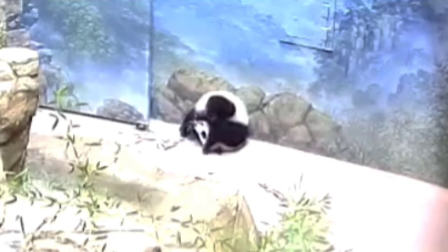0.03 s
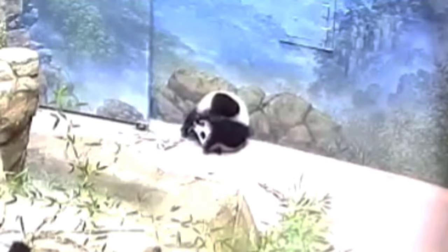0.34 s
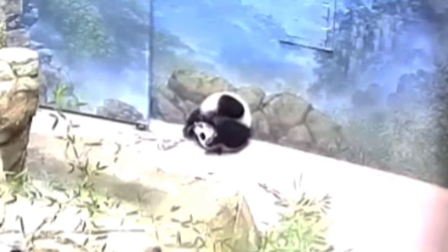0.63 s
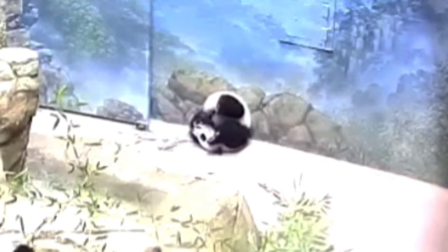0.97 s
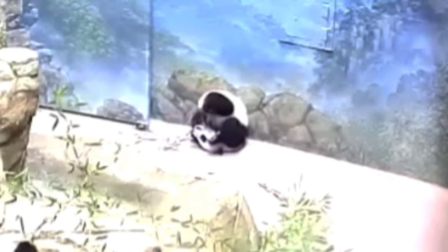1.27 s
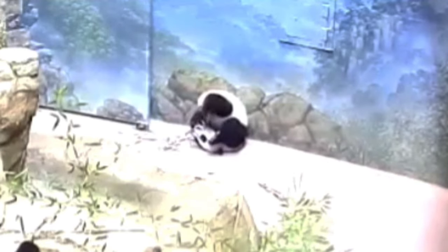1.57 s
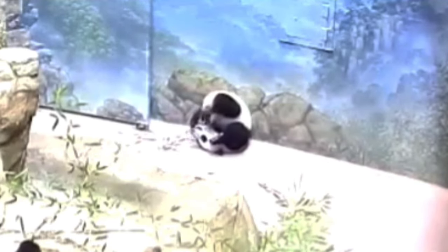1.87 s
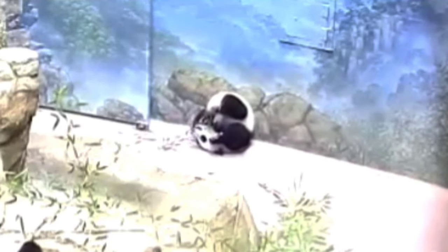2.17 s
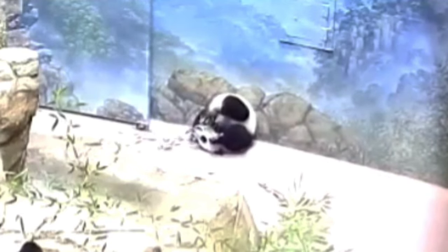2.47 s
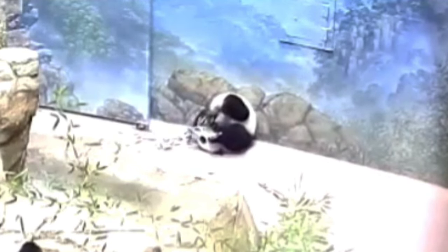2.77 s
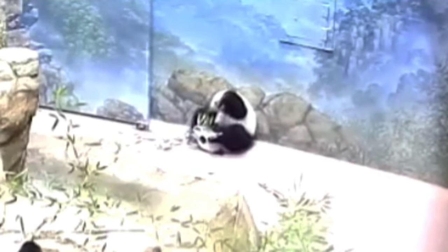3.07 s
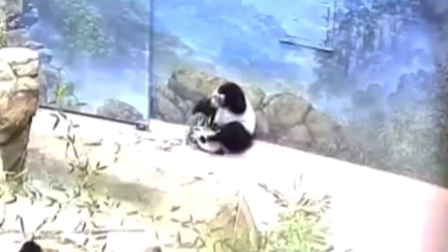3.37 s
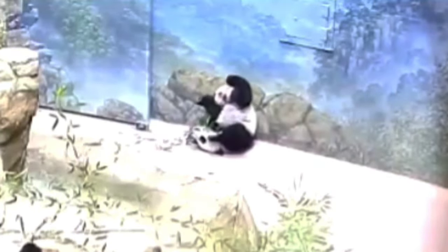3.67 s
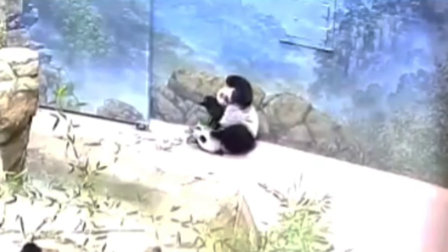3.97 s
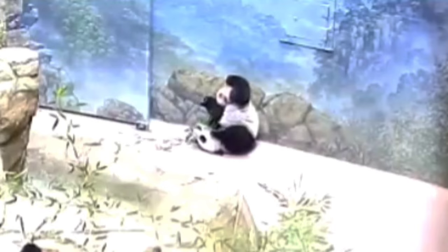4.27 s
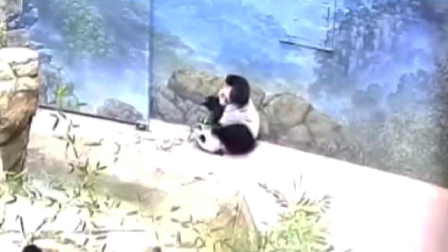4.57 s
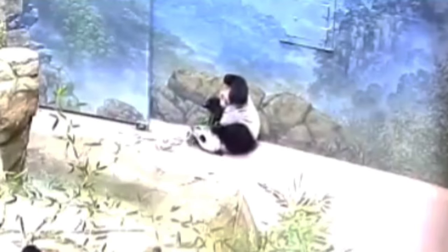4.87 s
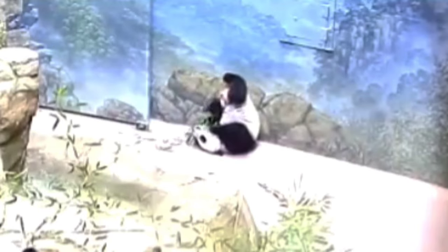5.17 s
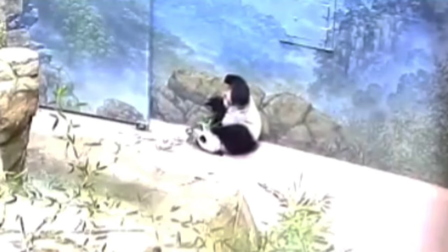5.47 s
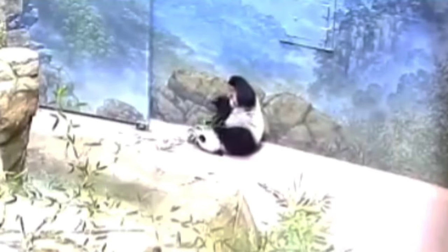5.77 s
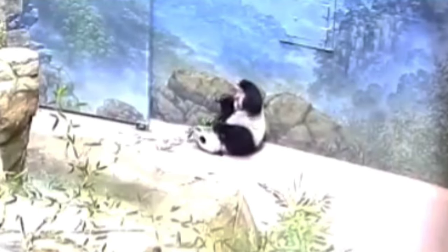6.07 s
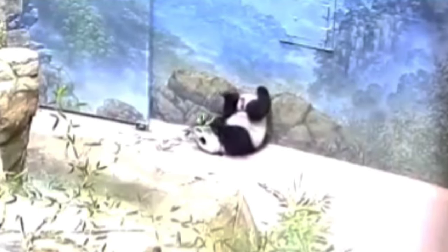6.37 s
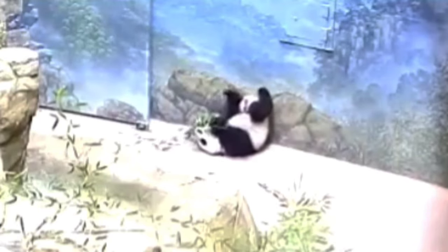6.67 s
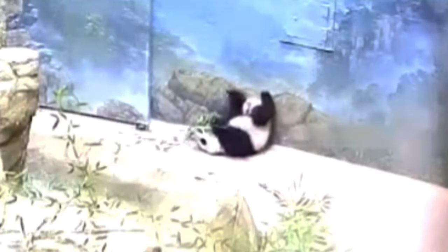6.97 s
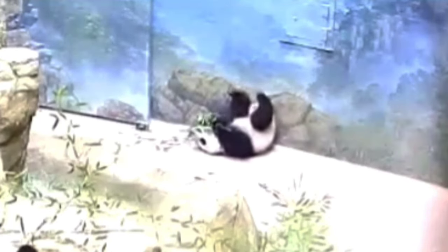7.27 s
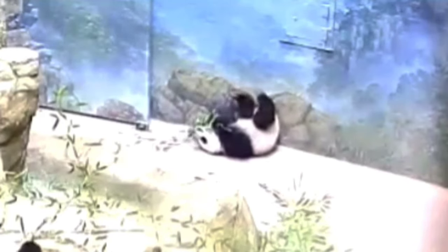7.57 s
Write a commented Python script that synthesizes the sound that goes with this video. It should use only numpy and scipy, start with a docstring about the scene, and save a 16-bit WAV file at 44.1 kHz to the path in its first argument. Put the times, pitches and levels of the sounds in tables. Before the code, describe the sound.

Ventilation rushes steadily in an echoing animal enclosure while a panda, several metres from a small mono microphone, splinters a bamboo stalk and tears off a strip. Lighter, irregular snaps follow, with quiet chewing, stirring leaves and faint dull knocks. Near the end another strip rips off loudly, followed by more bites. The hiss dips at each rip and creeps back up.

```python
"""A hard-walled indoor enclosure, with a small mono camera microphone some metres from a feeding panda.
The panda bites dry bamboo: each snap is a quick run of breaking fibres that rings the stalk, and twice a
long strip rips off. Between bites come chewing, stirring leaves and bumps on the ledge. The hall rings
over steady ventilation; the camera's gain control ducks at the rips and creeps back up."""
import sys
import numpy as np
from scipy import signal
from scipy.fft import rfft, irfft
from scipy.io import wavfile
from scipy.ndimage import uniform_filter1d, minimum_filter1d

SR = 44100
rng = np.random.default_rng(int(sys.argv[2]) if len(sys.argv) > 2 else 0)


def wav_out(sig):
    """Save sig, one row per channel (or a flat mono array), as 16-bit PCM at SR to the path in sys.argv[1]."""
    wavfile.write(sys.argv[1], SR, np.round(np.clip(np.atleast_2d(sig).T, -1, 1) * 32767).astype(np.int16))


N = 340452
TIME = np.arange(N) / SR
BIN_HZ = np.arange(N // 2 + 1) * SR / N

# rush of the ventilation: f/Hz, relative level/dB
AIR_SPECTRUM = [(22, -35), (48, -15), (130, -13.5), (280, -15), (400, -6), (520, -0.5), (680, -6.5),
                (850, -2), (1550, -1.5), (2000, -6.5), (2500, -15), (3900, -21), (5000, -20.5),
                (6800, -24.5)]
# resonances of the air ducts: f/Hz, width/Hz, level/dB
DUCT_MODES = [(46.4, 17, -72.5), (199.5, 31, -66), (390.4, 67, -58), (490, 36, -70), (844, 40, -57),
              (1560, 60, -51.5), (3880, 90, -63.5)]
# decay of the hall: f/Hz, reverberation time/s
HALL_DECAY = [(300, 0.67), (900, 2.1), (2000, 1.48), (4000, 1.27), (7000, 1.11)]
# reflections from the ledge and the walls: delay/s, level re direct sound/dB
WALL_ECHOES = [(.0045, -11.5), (.017, -12.5), (.034, -11.5)]
# dull knocks of the body and stalks on the ledge: t/s, relative level/dB, f/Hz
LEDGE_BUMPS = [(1.074, -39.5, 354), (1.169, -38.5, 416), (2.115, -34, 834), (2.12, -37, 430),
               (3.27, -42.5, 423), (4.33, -46.5, 386), (6.903, -38, 350), (6.939, -37, 370),
               (7.651, -42, 390)]
# crackle of dry leaves: f/Hz, relative level/dB
LEAF_SPECTRUM = [(300, -15), (1000, 3.5), (2000, 5), (3000, 2.5), (4200, -3), (5200, -8.5), (6500, 3.5),
                 (7400, -14.5)]
# swells of rustle: t/s, rise/s, peak level/dB, fade/(dB/s)
# first row stands for the hall still ringing from a crack just before the start; others: leaves stirring
RUSTLE_SWELLS = [(0, 0.0042, -32.5, 164), (1.14, 0.026, -40, 57), (1.549, 0.039, -44, 40),
                 (2.11, 0.034, -53.5, 35), (2.58, 0.037, -62, 42), (3.24, 0.063, -54, 87),
                 (3.75, 0.079, -60, 45), (5.92, 0.12, -55, 23.5), (6.89, 0.041, -39.5, 55),
                 (7.269, 0.036, -49.5, 42)]
# resonances of the bamboo stalk: f/Hz, width/Hz, relative level/dB
STALK_MODES = [(830, 220, -19), (1430, 180, -5), (2330, 260, -9), (2880, 240, -12), (3300, 220, -7),
               (4250, 400, -10), (5700, 500, -20), (6750, 550, -15)]
# crackle of peeling fibres: f/Hz, relative level/dB
PEEL_SPECTRUM = [(200, -34), (600, -15), (900, -11), (1300, -9), (1950, -1), (3200, 0.5), (3900, -11),
                 (4500, -7.5), (5200, -4.5), (6500, 0), (7400, -7)]
# strips tearing off: t/s, rise to the hardest pull/s, level there/dB, fade/(dB/s)
STRIP_RIPS = [(.405, 0.061, -15.5, 153.5), (6.36, 0.055, -19.5, 154)]
# bites: t/s, level/dB, break length/s, splinter f/Hz, hollow/dB, woody/dB, sharpness/dB
BITE_SNAPS = [(0.352, -30, 0.0053, 2010, -8, 10.5, 7), (0.362, -29, 0.014, 2100, -10, 5.5, 3),
              (0.383, -22.5, 0.004, 2770, -18, -1.5, 4), (0.395, -18, 0.0035, 2030, -15, 0, 13.5),
              (0.4, -22, 0.0032, 2040, -11, -2, 5), (0.421, -16.5, 0.0044, 2530, -7, 5, 4.5),
              (0.438, -20.5, 0.01, 3020, 0, -2, 14.5), (0.536, -18.5, 0.002, 2060, -13, 8, -6),
              (1.079, -33, 0.0055, 2100, 3.5, 1, -3), (1.16, -27, 0.0056, 2000, 0, -13, 0),
              (1.531, -38, 0.0015, 2440, -20, -1, 1), (1.560, -25, 0.0032, 2050, -4, -3, 5),
              (2.122, -27.5, .008, 1990, -0.5, -1, 5.5), (2.447, -38, 0.0038, 1380, 2, -11, -11),
              (2.947, -32.5, 0.0042, 1970, 0, 0.5, -5), (3.326, -35.5, 0.025, 2020, 4.5, -5, -7),
              (3.571, -42.5, 0.0028, 2130, 2, -0.5, -5), (3.846, -40, 0.014, 1920, 4, -2, -3),
              (3.892, -28, 0.01, 1840, 1.5, -7, -12), (4.030, -40, 0.0039, 1560, -2, -9, -1),
              (4.398, -32.5, 0.0065, 2100, 4, 5.5, -3.5), (4.915, -35, 0.0099, 1970, -3, 3.5, 3.5),
              (6.189, -30.5, 0.0046, 1650, 0, -5.5, -8.5), (6.333, -37.5, 0.012, 2130, -5, 4, -0.5),
              (6.356, -39, .0015, 2190, -9, 10, -1), (6.361, -18.5, .0019, 2060, -18, 2, 2.5),
              (6.377, -21, 0.0014, 2970, -16, 13.5, 10.5), (6.395, -25, 0.0025, 2700, -9, 6, 0),
              (6.407, -23, 0.0069, 1980, -10, -1, 4), (6.425, -21.5, 0.013, 3150, -1.5, 2, 10),
              (6.535, -25, 0.011, 2130, -3, -7.5, -6), (6.903, -31, 0.017, 2100, 3, 5, 2),
              (6.930, -22, 0.008, 2120, 0, -4.5, -1), (7.273, -33, 0.015, 2040, -6, 8.5, 5.5),
              (7.284, -33.5, 0.0072, 2120, -7, -5, 3), (7.320, -31, 0.0046, 1665, -8, -5, -15)]
# the stalk's top modes in a break of middling sharpness: hard/dB, crisp/dB
TOP_MODES_DB = (-1, 1.5)


def undb(db):
    """Decibels to gain."""
    return 10 ** (np.asarray(db) / 20)


def unit(x):
    """Scale to rms 1."""
    return x / np.sqrt(np.mean(x ** 2) + 1e-18)


def add(track, start, sound):
    """Mix a sound into the track, start seconds in."""
    i = max(int(start * SR), 0)
    track[i:i + len(sound)] += sound[:max(len(track) - i, 0)]


def resonate(x, hz, width):
    """A resonance with steep skirts: two band-passes in a row."""
    b, a = signal.iirpeak(hz, hz / (1.31 * width), fs=SR)
    return signal.lfilter(b, a, signal.lfilter(b, a, x))


def over_pitch(hz, points):
    """Read (f/Hz, value) points on a log-frequency axis."""
    f, value = np.transpose(points)
    return np.interp(np.log(hz + 1), np.log(f), value)


def coloured(x, spectrum):
    """Shape a sound by a smooth curve of (f/Hz, level/dB) points, at rms 1."""
    return unit(irfft(rfft(x) * undb(over_pitch(BIN_HZ, spectrum)), N))


def lag(x, tau_s):
    """Follow x with the time constant tau_s."""
    keep = np.exp(-1 / (tau_s * SR))
    return signal.lfilter([1 - keep], [1, -keep], x)


def swell(start, rise_s, peak_db, fade_db_per_s, rise_db):
    """Gain of one swell: it sets in, grows by rise_db to its peak and dies away."""
    past_peak = TIME - start - rise_s
    below_db = np.where(past_peak < 0, -past_peak / rise_s * rise_db, past_peak * fade_db_per_s)
    return (TIME >= start) * undb(peak_db - below_db)


def fibres(size, per_s, spread_db):
    """Impulses of fibres breaking at random moments, a few harder than the rest."""
    breaks = rng.random(size) < per_s / SR
    strength = undb(spread_db * np.minimum(rng.exponential(size=size), 4))
    return breaks * strength * rng.choice([-1, 1], size)


def ventilation(rush_db=-41.5, waver_db=.15):
    """Room tone: a broad rush of air with a few duct resonances, wavering slightly."""
    air = undb(rush_db) * coloured(rng.standard_normal(N), AIR_SPECTRUM)
    for hz, width, db in DUCT_MODES:
        air += undb(db) * unit(resonate(rng.standard_normal(N), hz, width))
    waver = signal.resample(rng.standard_normal(48), N)
    return air * undb(waver_db * waver)


def hall(x, build_s=0.0036, first_wall_s=.008):
    """Diffuse field: each band stores the energy it is fed and gives it back as a decaying wash."""
    edges_hz = np.geomspace(200, 7600, 23)
    tail, out = np.zeros(N), np.zeros(N)
    for lo, hi in zip(edges_hz, edges_hz[1:]):
        band = signal.butter(4, [lo, hi], "band", fs=SR, output="sos")
        hold_s = over_pitch(np.sqrt(lo * hi), HALL_DECAY) / (2 * np.log(1000))
        fed = lag(signal.sosfilt(band, x) ** 2, build_s)
        stored = lag(fed, hold_s)
        wash = unit(signal.sosfilt(band, rng.random(N) - .5))
        tail += np.sqrt(stored) * wash
    add(out, first_wall_s, tail)
    return out


def reflections(x):
    """The direct sound reaches the microphone first, then its echoes off the ledge and walls."""
    out = x.copy()
    for delay, db in WALL_ECHOES:
        add(out, delay, undb(db) * x)
    return out


def bumps(push_s=0.016, width_hz=110, contact_db=-14):
    """Soft, drawn-out contacts with the ledge that sound only a low resonance."""
    out, t = np.zeros(N), TIME[:SR // 4]
    for start, db, hz in LEDGE_BUMPS:
        force = rng.standard_normal(len(t)) * t * np.exp(-t / push_s)
        add(out, start, undb(db + contact_db) * unit(resonate(force, hz, width_hz)))
    return out


def rustle(rest_db=-58.5):
    """Light crackle of leaves and splinters; its opening swell stands for an earlier crack's tail."""
    level = undb(rest_db) + sum(swell(*row, rise_db=1.5) for row in RUSTLE_SWELLS)
    return level * coloured(fibres(N, per_s=900, spread_db=3.0), LEAF_SPECTRUM)


def stalk(force, splinter_hz, hollow_db=0, woody_db=0, sharp_db=0, detune=0.033):
    """The splinter rings at its own pitch; the place of the bite balances the stalk's modes."""
    hard_db, crisp_db = sharp_db + np.array(TOP_MODES_DB)  # a sharper break lifts both
    balance = [(1400, hollow_db), (2350, 0), (3420, woody_db), (4380, hard_db), (5700, crisp_db)]
    out = unit(resonate(force, splinter_hz, width=250))
    for hz, width, db in STALK_MODES:
        ring = resonate(force, hz * (1 + detune * rng.standard_normal()), width)
        out += undb(db + over_pitch(hz, balance)) * unit(ring)
    return out


def chewing(level_db=-63):
    """Single fibres give way as the panda chews, and ring the stalk in faint ticks."""
    force = fibres(N, per_s=20, spread_db=0.5)
    return undb(level_db) * unit(stalk(force, splinter_hz=1920))


def rips(jerks_per_s=120, jerk_spread_db=2.5):
    """A strip catches and gives as it peels off the stalk, each jerk a dense, bright crackle."""
    pull = sum(swell(*rip, rise_db=8) for rip in STRIP_RIPS)
    jerk_index = (TIME * jerks_per_s).astype(int)
    strength = np.sqrt(3) * rng.uniform(-1, 1, N)[jerk_index]  # unit variance, held through each jerk
    jerks = unit(undb(jerk_spread_db * strength))
    return pull * coloured(jerks * fibres(N, per_s=1300, spread_db=0.5), PEEL_SPECTRUM)


def snaps(fracture=1.3, trail=0.15, trail_s=0.018):
    """A bite breaks the stalk: a first fracture, milliseconds of splitting, a weak trail of splinters."""
    out, t = np.zeros(N), TIME[:SR // 10]
    burst_gain = np.sqrt(.01 * SR / len(t))  # packs the energy of 10 ms into each snap
    for start, db, break_s, hz, hollow_db, woody_db, sharp_db in BITE_SNAPS:
        splitting = np.exp(-(t / break_s) ** 4) + trail * np.exp(-t / trail_s)
        force = unit(fibres(len(t), per_s=4500, spread_db=1.5)) * splitting
        force[0] += fracture
        ring = stalk(force, hz, hollow_db, woody_db, sharp_db)
        add(out, start, undb(db) * burst_gain * ring)
    return out


def scene():
    """The feeding panda from some metres away: direct sound, echoes and hall over the ventilation."""
    bites, strips, rustling, knocks = snaps() + chewing(), rips(), rustle(), bumps()
    direct = bites + strips + rustling + knocks
    into_hall = bites + undb(3) * strips + undb(2) * rustling + undb(3) * knocks
    mono = reflections(direct) + hall(into_hall) + ventilation()
    return np.array([mono, mono])


def gain_control(x, limit_db=-21.5, recover_db_per_s=3.5, start_cut_db=6, sense_s=0.0096):
    """The gain drops at once when the level passes the limit, then climbs back at a steady rate."""
    power = uniform_filter1d(x[0] ** 2, int(sense_s * SR))
    excess_db = np.maximum(10 * np.log10(np.abs(power) + 1e-12) - limit_db, 0)
    recovered_db = recover_db_per_s * TIME
    cut_db = np.maximum.accumulate(np.maximum(excess_db + recovered_db, start_cut_db)) - recovered_db
    return x * undb(-cut_db)


def limiter(x, ceiling=.205, window=90):
    """Hold the sharpest peaks under the ceiling with a dip of a few milliseconds."""
    allowed = ceiling / np.maximum(np.abs(x).max(axis=0), ceiling)
    return x * uniform_filter1d(minimum_filter1d(allowed, window), window)


def record(dry, band_hz=7100, sizzle_top_hz=15700, headroom=0.48):
    """A narrow-band camera microphone with gain control; loud passages saturate into a faint sizzle."""
    narrow = signal.sosfilt(signal.ellip(8, .3, 70, band_hz, fs=SR, output="sos"), dry)
    levelled = limiter(gain_control(narrow))
    rounded = headroom * np.tanh(levelled / headroom)
    return signal.sosfilt(signal.ellip(8, .2, 70, sizzle_top_hz, fs=SR, output="sos"), rounded)


dry = scene()
out = record(dry)
wav_out(out)
```